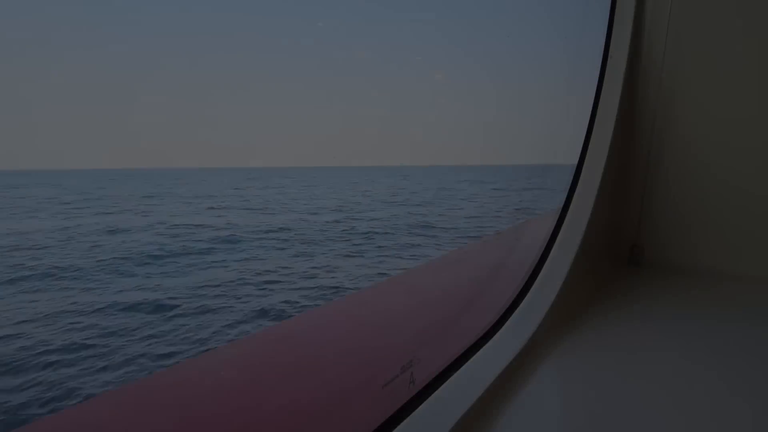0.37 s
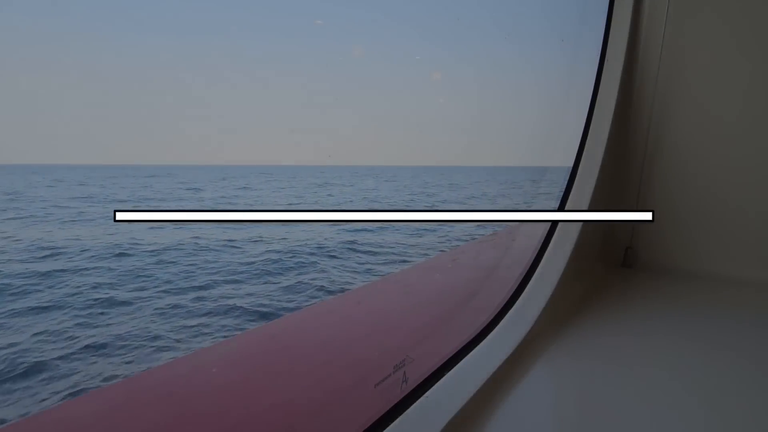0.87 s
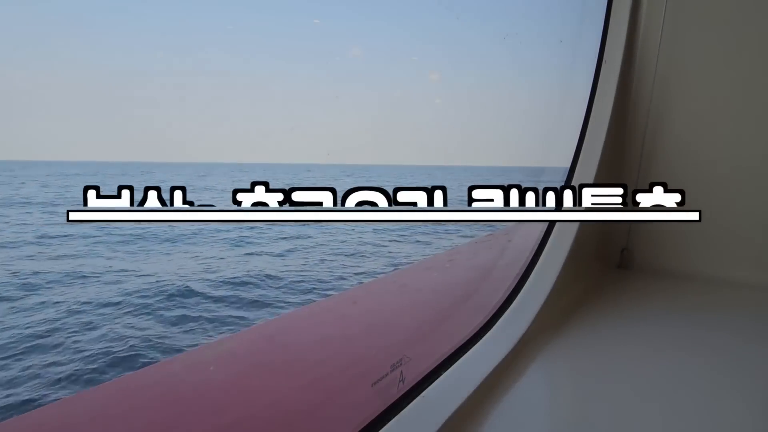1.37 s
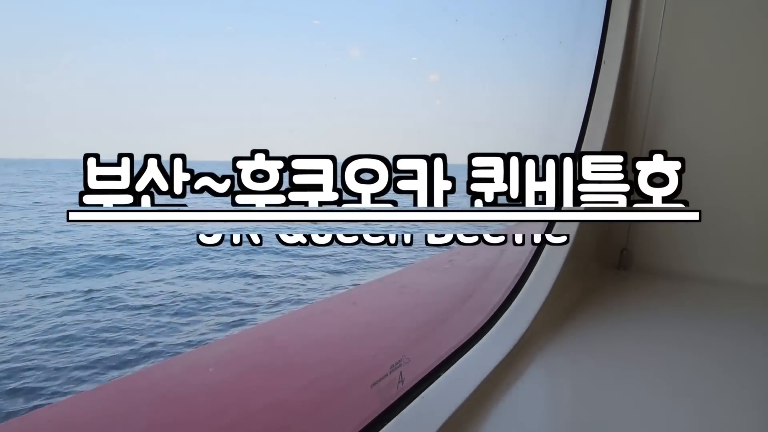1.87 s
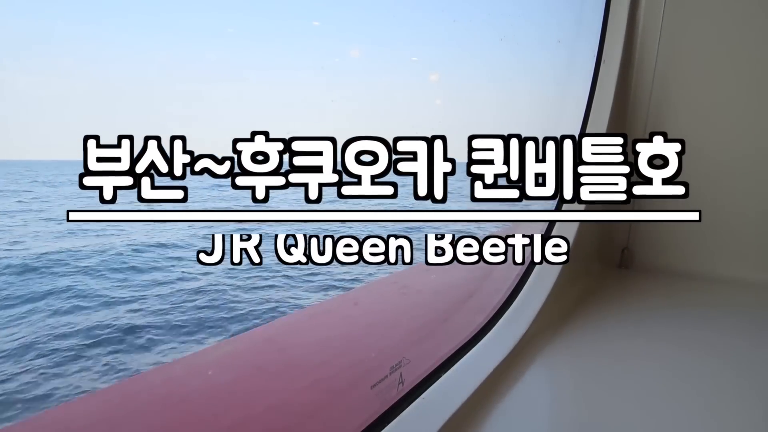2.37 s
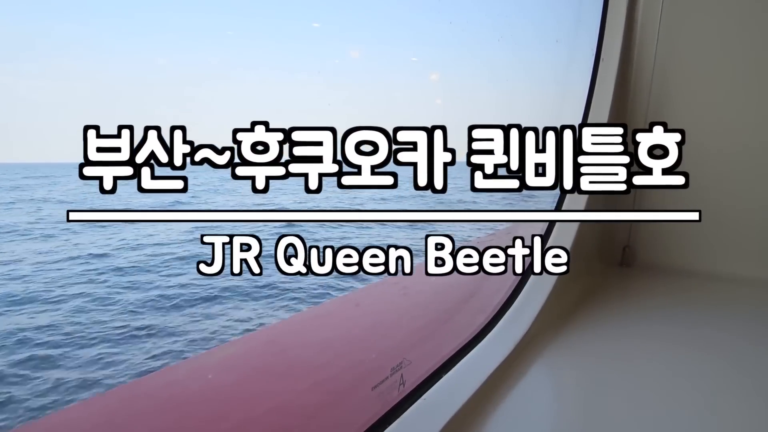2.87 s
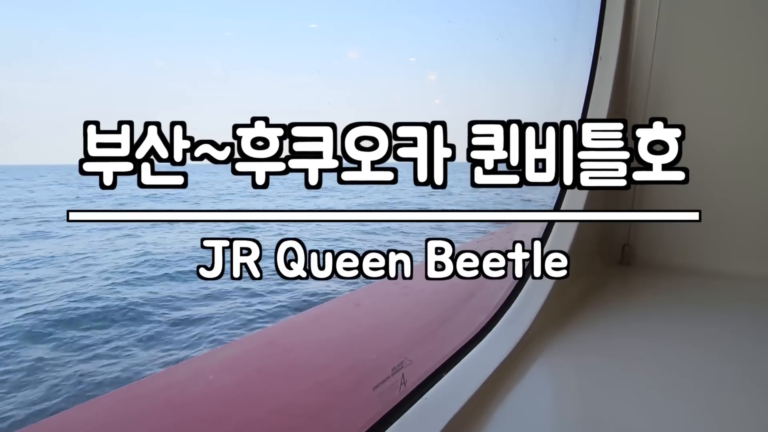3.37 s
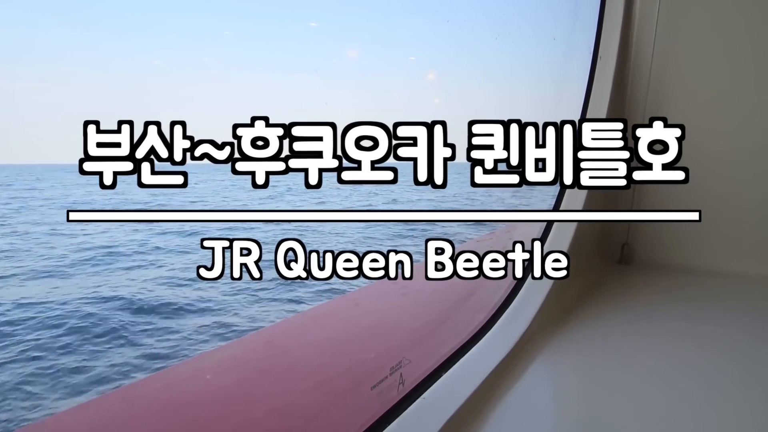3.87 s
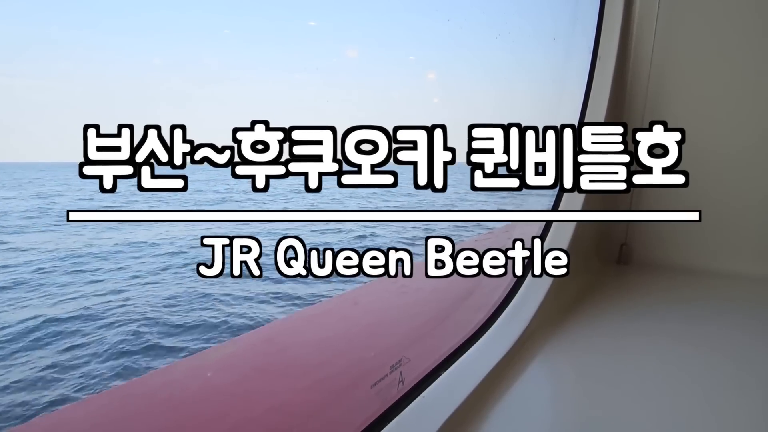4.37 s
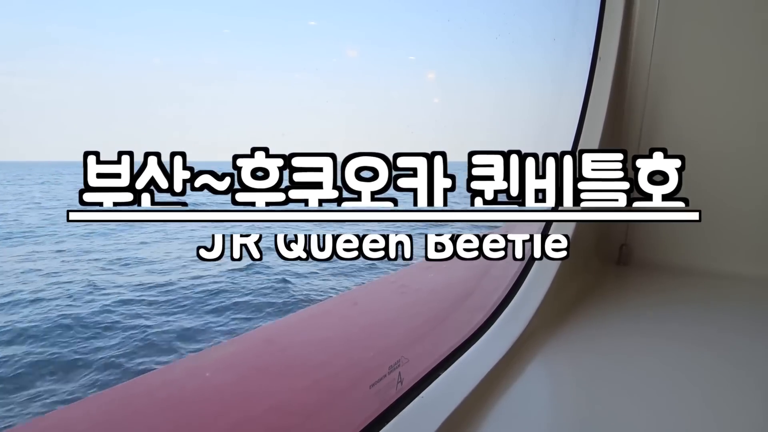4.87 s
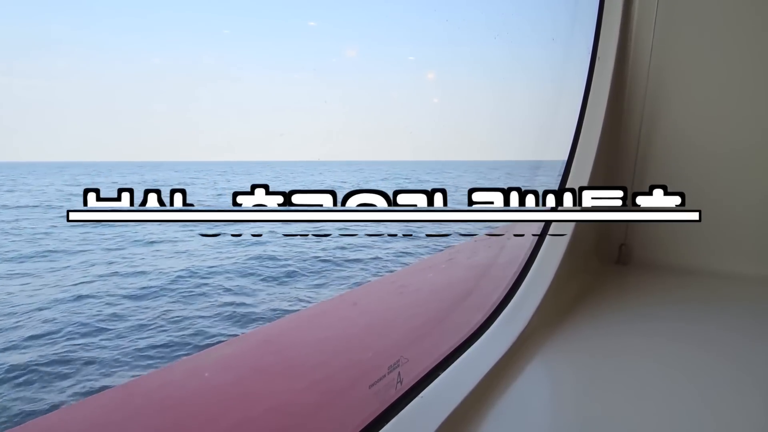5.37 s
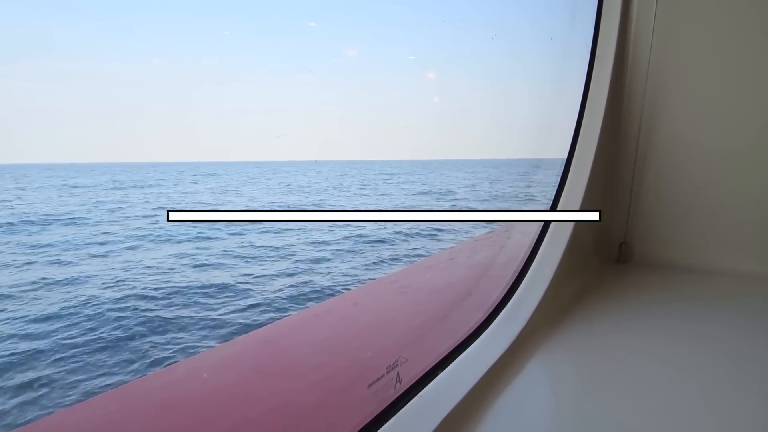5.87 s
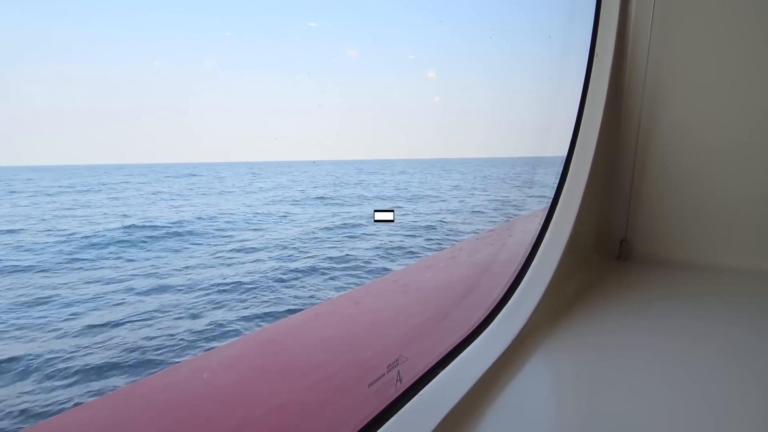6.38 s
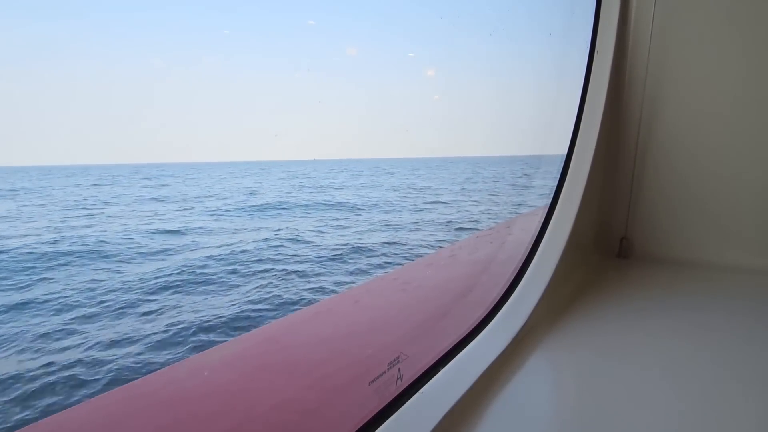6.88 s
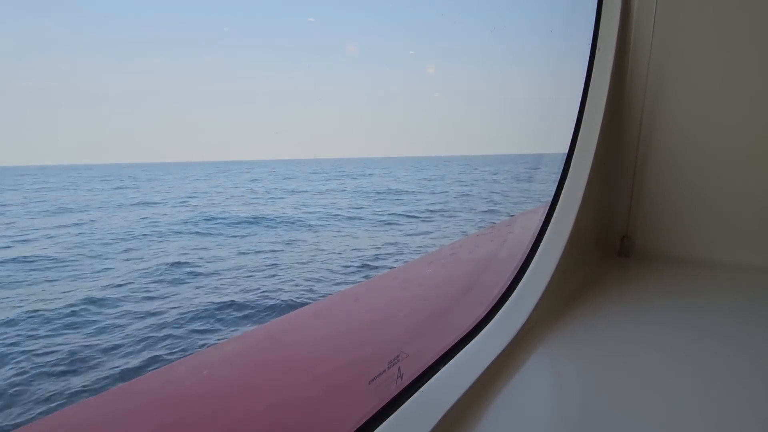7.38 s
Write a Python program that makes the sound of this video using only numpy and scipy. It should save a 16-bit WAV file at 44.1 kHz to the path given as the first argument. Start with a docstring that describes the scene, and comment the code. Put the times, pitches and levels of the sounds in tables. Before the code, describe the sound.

A low, dominant engine drone at a fixed pitch near seventy-five hertz runs throughout, wavering in strength, with soft rumbling from the hull. Thin wash hisses past the window, leaning right, fading near two seconds, returning, fading again around five amid short ticks of spray, then rising before two more. It is a small enclosed ferry cabin with a close stereo microphone, its sound muffled and boomy below and lightly airy above.

```python
"""The cabin of a fast ferry at sea. From the start sixteen-cylinder diesels drone, built from sine waves, and the
hull rumbles, made of coloured noise. Wash, also noise, hisses on the right as short spray bursts come and go.
After about a second the firing tone swells and sinks, with one deep dip near 1.4 s; the wash ebbs until 2 s.
It then swells, ebbs near 5 s amid a second cluster of spray, and swells again before two bursts near 7 s."""
import sys
import numpy as np
from scipy import signal
from scipy.fft import rfft, irfft, next_fast_len
from scipy.io import wavfile

SR = 44100
rng = np.random.default_rng(int(sys.argv[2]) if len(sys.argv) > 2 else 0)


def master(y):
    """Save y as 16-bit WAV."""
    cut = np.clip(np.atleast_2d(y).T, -1, 1)
    pcm = np.round(cut * 32767)  # scale
    wavfile.write(sys.argv[1], SR, pcm.astype(np.int16))


def gain_from_db(level_db):
    """Convert decibel levels to linear amplitude factors (20 dB per decade)."""
    decades = np.asarray(level_db, float) / 20
    return 10 ** decades


N = 330794   # samples, about 7.5 s


def rms_one(x):
    """Scale a signal to an average strength (rms) of 1."""
    return x / np.sqrt(np.mean(x ** 2) + 1e-20)


def in_time(rows):
    """Turn a table that starts with time into one smooth curve per further column, sample by sample."""
    s, *columns = np.transpose(rows)
    return [np.interp(np.arange(N) / SR, s, c) for c in columns]


def at_hz(points, hz):
    """Read a table that starts with frequency, joining its points on a log-frequency axis."""
    table = np.array(points)
    return np.interp(np.log(hz), np.log(table[:, 0]), table[:, 1])


def drift(rate_hz):
    """Slow random wandering of rms 1: noise at every 40th sample, smoothed twice by a one-pole low-pass."""
    r = np.exp(-80 * np.pi * rate_hz / SR)
    noise = rng.standard_normal(N // 40 + 2002)
    slow = signal.lfilter([1], [1, -2 * r, r * r], noise)[2000:]   # skip the filter's start
    return np.interp(np.arange(N) / 40, np.arange(len(slow)), rms_one(slow))


def cabin_paths(hz, size, echo_s=0.0039, ripple=0.31, from_hz=720):
    """Close, fast-fading echoes give each side its own phase and ripple, once the wavelength is short."""
    echoes = rng.standard_normal((2, 2048)) * np.exp(-np.arange(2048) / (echo_s * SR))
    energy = np.sum(echoes ** 2, axis=1, keepdims=True)
    paths = rfft(echoes / np.sqrt(energy), size)
    short = np.clip((hz / from_hz - 1) * 4, 0, 1)   # fades the echoes in above from_hz
    phase = np.unwrap(np.angle(paths))
    return np.abs(paths) ** (ripple * short) * np.exp(1j * short * phase)


# how much of the noise both sides share: (frequency [Hz], share of power [0-1])
SHARED_BY_SIDES = [(60, 0.83), (150, 1), (290, 0.87), (400, 0.8), (600, 0.39), (800, 0.14), (1300, 0.5),
                   (2200, 0.22), (4000, 0.69), (15000, 0.29)]
# how much louder the left is than the right, used above 100 Hz: (frequency [Hz], level [dB])
LEFT_OVER_RIGHT_DB = [(60, 14), (92, 5.5), (140, 0.5), (210, 1.5), (330, 4), (500, 2.5), (770, -1.5),
                      (1170, -2), (1790, -4), (2740, -7), (4190, -7.5), (6410, -6), (9810, -10),
                      (15000, -0.5)]
# resonances and hollows of window and cabin lining: (centre [Hz], width [Hz], level [dB])
LINING_RESONANCES = [(307, 14, 3), (352, 35, -3), (384, 18, 4), (422, 16, 2.5), (472, 25, -4),
                     (538, 30, 3.5), (725, 25, 2), (770, 25, -2), (925, 45, 4), (965, 25, -3),
                     (1135, 30, 3), (1268, 45, 3.5), (1430, 40, 3), (1550, 50, 3), (1780, 120, -2),
                     (1920, 55, 6), (2165, 90, 4), (3180, 140, 7), (3575, 150, 4), (4620, 180, 3),
                     (5050, 340, -3.5), (5340, 130, 5), (5870, 280, -2.5), (6760, 420, -2), (7440, 330, 3),
                     (8170, 90, 4)]


def stereo_bands(spectrum, level_band):
    """Stereo noise coloured by spectrum and cabin, rms 1 within level_band, as octave bands: (centre Hz, band)."""
    size = next_fast_len(N)
    hz = np.maximum(np.arange(size // 2 + 1) * SR / size, 1)
    common, *own = rfft(rng.standard_normal((3, size)))
    alike = np.clip(at_hz(SHARED_BY_SIDES, hz), 0, 1)
    pair = np.sqrt(alike) * common * cabin_paths(hz, size) + np.sqrt(1 - alike) * np.array(own)

    lean_db = at_hz(LEFT_OVER_RIGHT_DB, hz) / 2 * (hz > 100)   # half for each side
    lining_db = sum(db / (1 + (2 * (hz - centre) / width) ** 2) for centre, width, db in LINING_RESONANCES)
    sides_db = [lining_db + lean_db, lining_db - lean_db]
    pair = pair * gain_from_db(at_hz(spectrum, hz) + sides_db) * (hz > 16)

    # set the level on the average of left and right
    inside = (hz > level_band[0]) & (hz < level_band[1])
    power = np.mean(inside * np.abs(pair.mean(axis=0)) ** 2)
    pair = pair * np.sqrt(size / power)

    # six centres an octave apart; each band fades into its neighbours
    centres = spectrum[-1][0] / 2 ** np.arange(6)[::-1]
    place = np.interp(np.log(hz), np.log(centres), np.arange(6))
    for k, centre in enumerate(centres):
        share = np.maximum(1 - np.abs(place - k), 0)
        yield centre, irfft(pair * share, size)[:, :N]


# colour of the plating's rumble: (frequency [Hz], relative level per Hz [dB])
RUMBLE_COLOUR = [(22, -36), (30, -19.5), (45, -21.5), (58, -19), (68, -15.5), (82, -14.5), (94, -17),
                 (104, -18), (120, -26.5), (141, -19.5), (165, -25.5), (205, -26.5), (225, -25.5),
                 (250, -27), (288, -29.5), (345, -35.5), (450, -34), (680, -33.5), (800, -60), (1200, -80)]


def hull(level_db, upper_db, deep_db):
    """The plating rumbles as coloured noise; each band heaves a little on its own."""
    out = 0
    for hz, band in stereo_bands(RUMBLE_COLOUR, (85, 330)):
        gain_db = upper_db if hz > 330 else deep_db if hz < 60 else level_db
        heave_db = 1.1 * drift(4.0)
        out = out + gain_from_db(gain_db + heave_db) * band
    return out


# spray on the window: (time [s], level before onset and treble weighting, on the wash's scale [dB],
# length [s], sharpness: extra level at the very top [dB])
SPRAY_BURSTS = [(.437, -60, .03, 5), (.931, -51, .03, 4), (1.14, -55, 0.033, 3), (1.581, -54, .03, 5),
                (2.065, -48.5, 0.057, 1.5), (4.741, -51, 0.04, 7), (4.812, -51, 0.017, 5),
                (4.831, -51.5, 0.058, 4), (5.223, -57, .035, 7), (5.376, -51, 0.094, -1),
                (5.646, -59, .05, 5), (7.017, -55, .025, 0.3), (7.16, -52, .03, 11)]


def spray_bursts(attack_s=0.0027):
    """Loudness shapes of the spray: each burst sets in fast, holds and dies; returned with their sharpness."""
    t = np.arange(N) / SR
    shapes = []
    for s, level_db, length_s, _ in SPRAY_BURSTS:
        age = np.maximum(t - s, 0)
        onset = 1 - np.exp(-age / attack_s)
        fade = np.exp(-(age / length_s) ** 2)
        shapes.append(gain_from_db(level_db) * onset * fade)
    return np.array(shapes), np.array(SPRAY_BURSTS)[:, 3]


# colour of the wash: (frequency [Hz], relative level per Hz [dB])
WASH_COLOUR = [(250, -21), (500, -8.5), (760, -0.5), (1000, -4.5), (1280, 1.5), (1550, -4), (1780, -11),
               (2100, -10.5), (3200, -16.5), (4700, -18), (5100, -21), (6600, -23.5), (7400, -21.5),
               (9200, -28.5), (9450, -41), (11000, -38.5), (11900, -29), (15500, -40)]


def wash(wash_db, bright_db):
    """Water rushing along the side is hissing noise; its treble flickers in step, and spray lifts the upper bands."""
    out = 0
    flicker_db = 1.44 * (0.3 * drift(8.0) + 0.72 * drift(27.0))
    shapes, sharp_db = spray_bursts()
    for hz, band in stereo_bands(WASH_COLOUR, (900, 5000)):
        height = np.clip(np.log2(hz / 1000) / 4, 0, 1)   # 0 at the foot of the treble, 1 at its top
        treble_db = height * (bright_db + flicker_db)
        patchy_db = 0.5 * drift(15.0)   # each band varies on its own
        flow = gain_from_db(wash_db + treble_db + patchy_db)
        sharpness = gain_from_db(sharp_db * (height - 0.7) / 0.3)
        spray = height * (sharpness @ shapes)
        out = out + np.sqrt(flow ** 2 + spray ** 2) * band   # flow and spray add as powers
    return out


CYCLE_HZ = 9.327   # engine cycles per second
# the firing tone, eighth order of the engine cycle: (time [s], level [dB])
FIRING_TONE = [(0.0, -28.5), (0.2, -28.5), (0.33, -33), (0.75, -34.5), (0.91, -37.5), (1.07, -30),
               (1.27, -29.5), (1.43, -50), (1.57, -28.5), (1.9, -35.5), (2.19, -27.5), (2.43, -33.5),
               (2.56, -29.5), (3.5, -28.5), (3.93, -34), (4.17, -28), (4.27, -36), (4.38, -27.5),
               (4.67, -31.5), (5.2, -27.5), (5.7, -30), (6.33, -28.5), (6.47, -34), (6.63, -30),
               (7.12, -29), (7.5, -31)]
# other orders of the cycle, before wavering and heave: (multiple of the cycle rate [-], level [dB])
OTHER_ORDERS = [(3, -61), (4, -59), (5, -47), (6, -62), (7, -49), (9, -49), (10, -60), (11, -58), (12, -59),
                (13, -66), (14, -57), (15, -60), (16, -66), (17, -68), (21, -69), (24, -67), (31, -69),
                (40, -74), (41, -69), (72, -66)]


def engines(deep_db):
    """Diesels drone as sines at multiples of the cycle; uneven firing intervals shake the pitch each cycle."""
    turn = 2 * np.pi * CYCLE_HZ * np.arange(N) / SR
    firing_db, = None,
    firing, = in_time([(s, gain_from_db(db)) for s, db in FIRING_TONE])
    wander = 0.4 * drift(2.0)   # rad; the hull mode near the firing tone shifts its phase as the ship works
    out = firing * np.cos(8 * turn + wander)
    for k, level_db in OTHER_ORDERS:
        if k in (7, 9):   # the firing tone's neighbours keep a set phase offset from it, which wanders only slightly and slowly
            start = 1.2 + wander
        else:
            start = rng.uniform(0, 2 * np.pi)
        # several engines at nearly one speed make each order waver; the deep ones follow the heave
        waver_db = 1.5 * drift(0.66)
        heave_db = (k < 6) * (deep_db + 43)   # relative to -43 dB
        phase = k * turn + start + 0.31 * drift(0.28)
        out = out + gain_from_db(level_db + waver_db + heave_db) * np.cos(phase)
    return np.sqrt(2) * out   # makes the levels rms levels


# hull rumble: (time [s], level at 85-330 Hz [dB], level of the deep part [dB])
HULL_HEAVE = [(0.0, -43, -40.5), (0.83, -43, -38.5), (2.0, -42, -39), (2.5, -41.5, -43),
              (3.2, -44.5, -44.5), (3.75, -43.5, -40.5), (5.0, -44.5, -48), (6.25, -42.5, -48),
              (6.67, -44, -44), (7.5, -44.5, -43.5)]
# wash at 900-5000 Hz, rising and falling with the swell: (time [s], level [dB])
SEA_SWELL = [(0.0, -54.5), (0.5, -56.5), (1.0, -57), (1.17, -59), (1.5, -56.5), (1.83, -61), (2.0, -61),
             (2.3, -55.6), (2.67, -54), (3.7, -55.5), (4.15, -55), (4.5, -56), (4.83, -62.5), (5.2, -62.3),
             (5.5, -62), (5.7, -56.5), (6.5, -55), (7.0, -55.5), (7.5, -57)]


def scene():
    """The swell sets the wash, its brightness and the upper rumble; the deep orders follow the deep rumble."""
    level_db, deep_db = in_time(HULL_HEAVE)
    wash_db, = in_time(SEA_SWELL)
    swing_db = wash_db + 57   # swell relative to -57 dB
    upper_db = -44.5 + 0.59 * swing_db   # rumble above 330 Hz follows part of the swing
    bright_db = -0.17 * swing_db   # the highest band of the wash swings less
    return hull(level_db, upper_db, deep_db) + wash(wash_db, bright_db) + engines(deep_db)


def band_limit(x):
    """A steep low-pass at the top of the band."""
    return signal.sosfilt(signal.butter(12, 16930, fs=SR, output="sos"), x)


def record(dry):
    """A steep low-pass cuts the top; the sound begins after a few silent milliseconds."""
    cutoff_hz, start_s = 15720, 0.0048
    low_pass = signal.ellip(12, 0.5, 60, cutoff_hz, fs=SR, output="sos")
    cut = signal.sosfilt(low_pass, dry)
    finished = cut * (np.arange(N) > start_s * SR)
    return band_limit(finished)


dry = scene()
out = record(dry)
master(out)
```